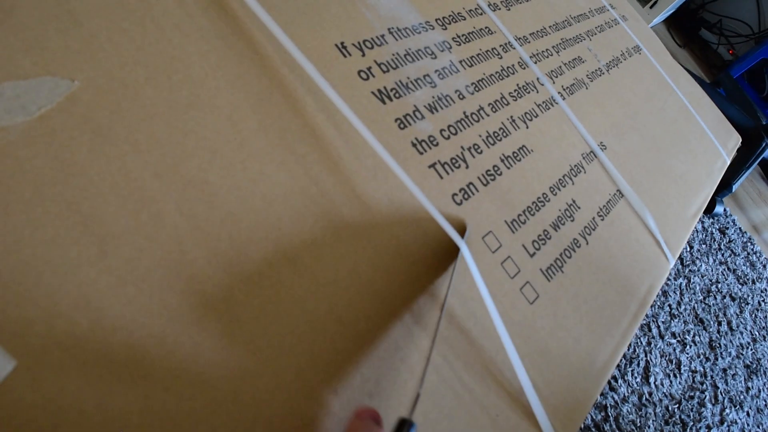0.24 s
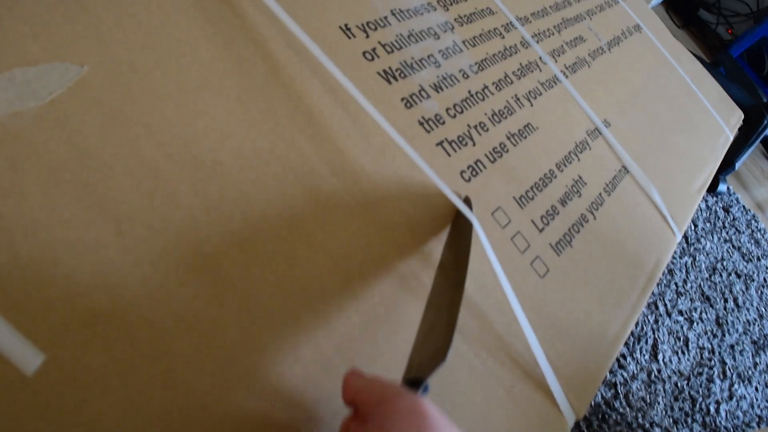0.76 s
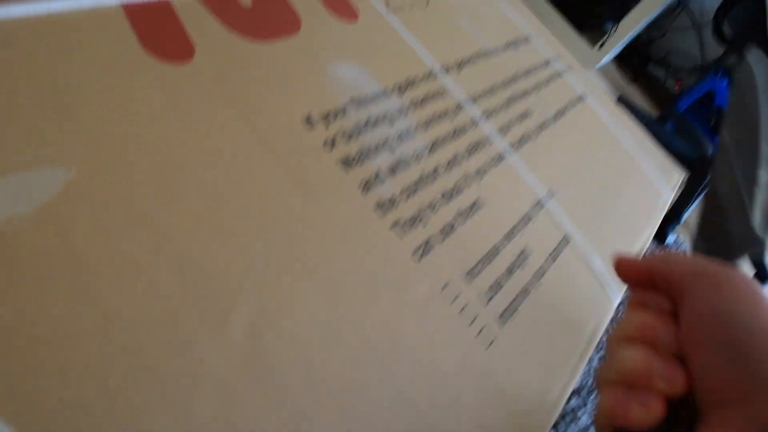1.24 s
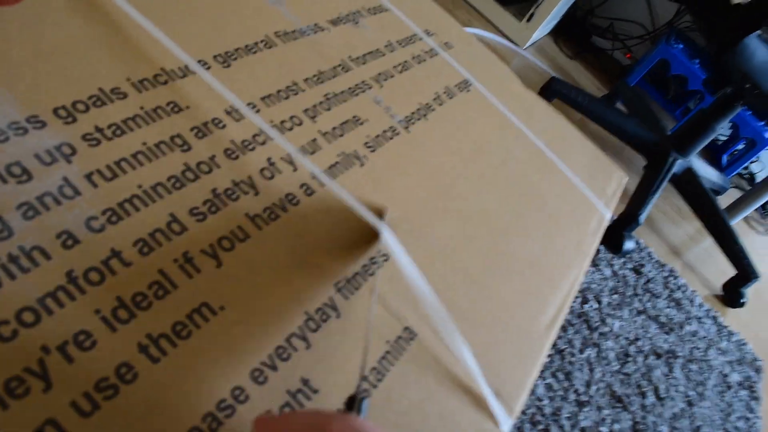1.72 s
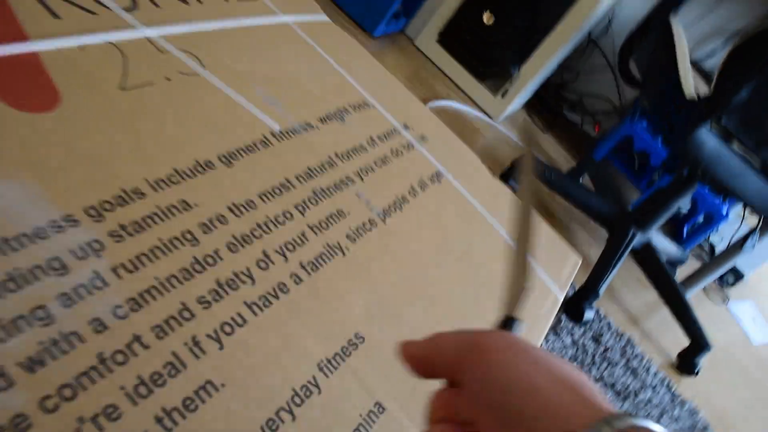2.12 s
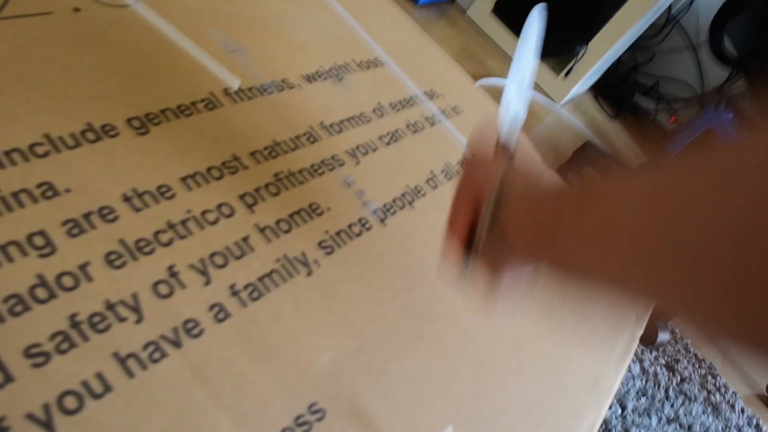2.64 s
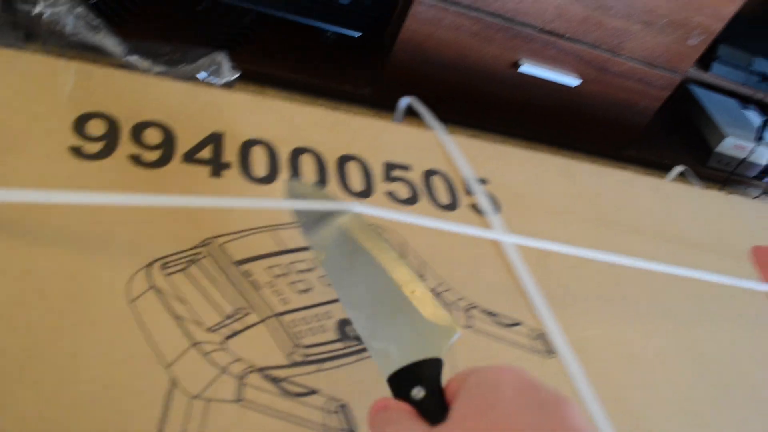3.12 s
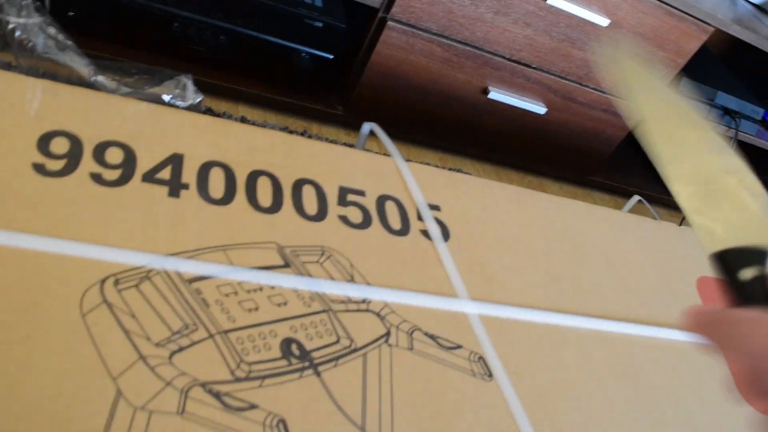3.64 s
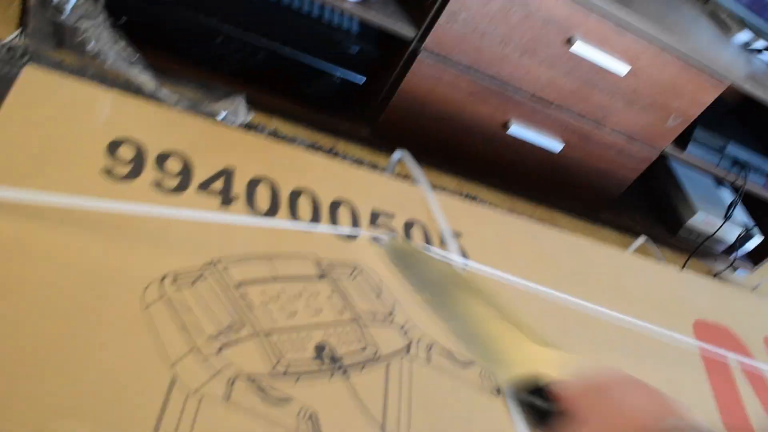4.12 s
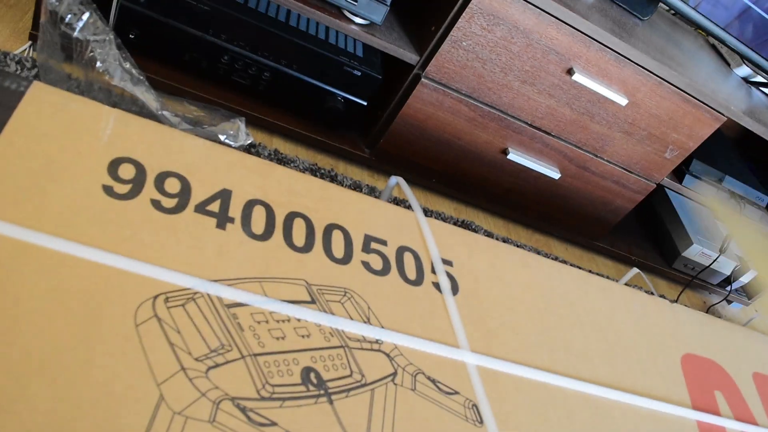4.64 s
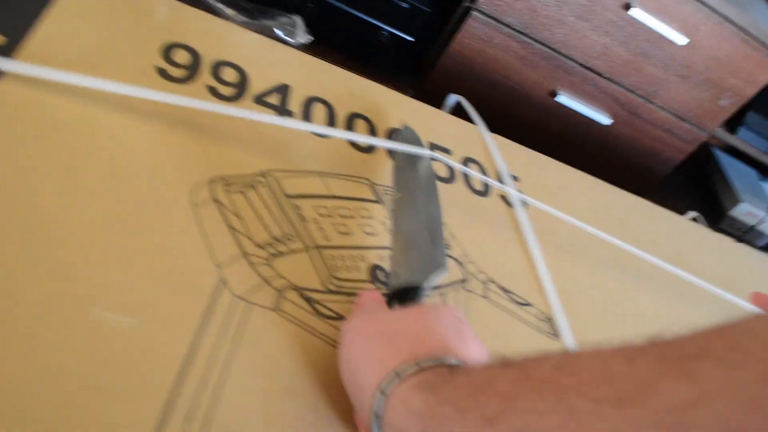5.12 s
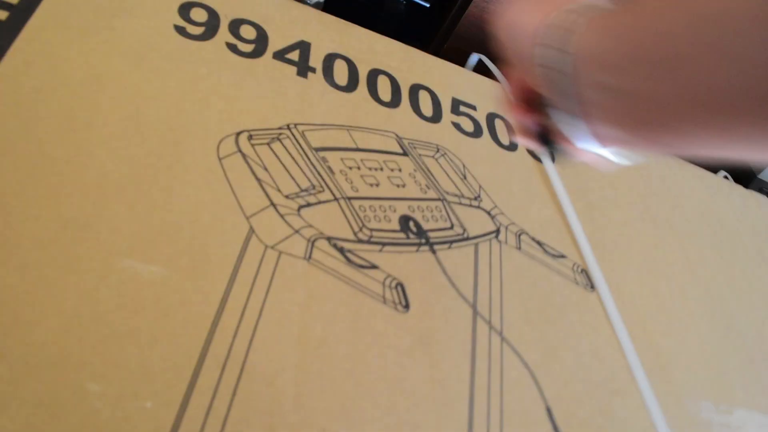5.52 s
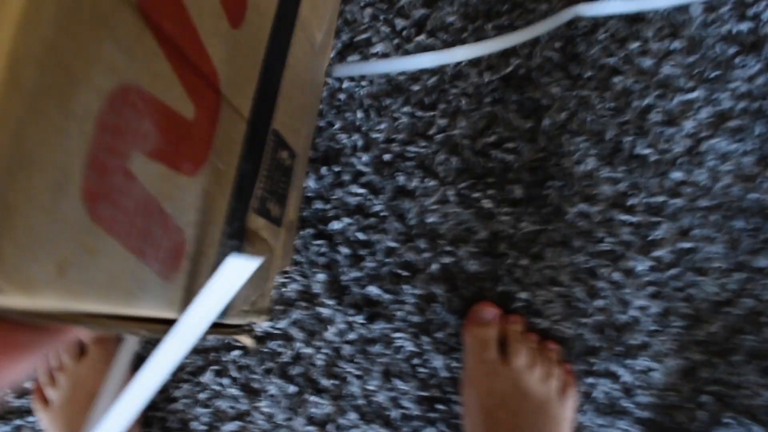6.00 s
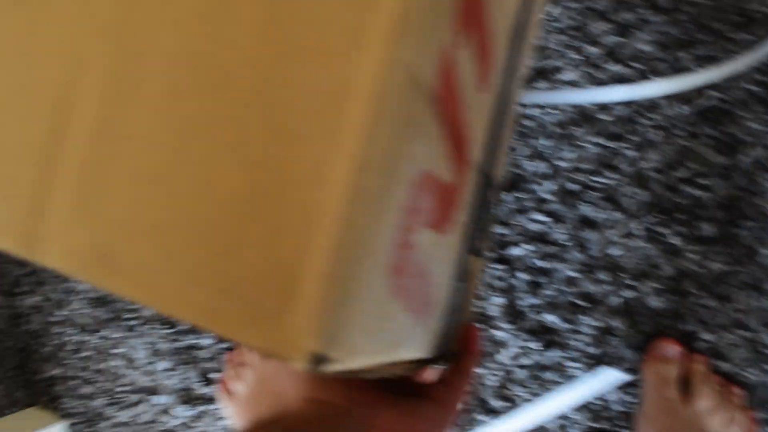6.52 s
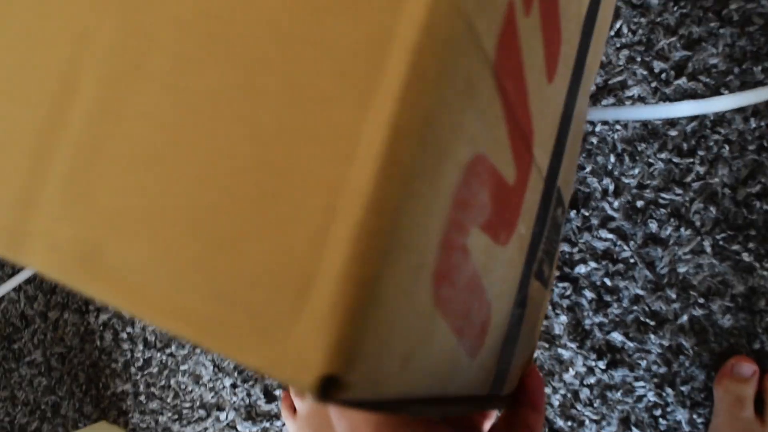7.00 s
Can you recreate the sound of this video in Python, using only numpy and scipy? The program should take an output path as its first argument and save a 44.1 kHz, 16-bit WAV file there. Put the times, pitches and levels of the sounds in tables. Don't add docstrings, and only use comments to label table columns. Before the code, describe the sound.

Close indoor scraping and boxy thumps, sharp snaps of parting plastic straps with clattering tails, then loose strap scuffing over cardboard.

```python
import sys
import numpy as np
from scipy import signal
from scipy.fft import rfft, irfft, next_fast_len
from scipy.io import wavfile
from scipy.ndimage import uniform_filter1d

SR = 44100
rng = np.random.default_rng(int(sys.argv[2]) if len(sys.argv) > 2 else 0)


def wav_out(sig):
    wavfile.write(sys.argv[1], SR, np.round(np.clip(np.atleast_2d(sig).T, -1, 1) * 32767).astype(np.int16))


def volts_from_decibels(level):
    exponent = np.asarray(level, float) / 20
    return 10 ** exponent


N = 320166

# (from [s], to [s], later by [s])
AGAIN = (1.475, 2.248, 3.4)


def along(points, hz):
    f, v = np.transpose(points)
    return np.interp(np.log(hz + 1), np.log(f + 1), v)


def filtered(x, response):
    m = next_fast_len(len(x) + 8192)
    return irfft(rfft(x, m) * response(np.fft.rfftfreq(m, 1 / SR)), m)[:len(x)]


def coloured(x, spectrum):
    return filtered(x, lambda f: volts_from_decibels(along(spectrum, f)))


def resonances(modes):
    def response(f):
        total = 0
        for k, (c, w, db) in enumerate(modes):
            total = total + (-1) ** k * volts_from_decibels(db) * 1j * f * w / (c * c - f * f + 1j * f * w)
        return total
    return response


def level(x, lo_hz, hi_hz):
    return x / np.std(filtered(x, lambda f: (f > lo_hz) & (f < hi_hz)))


def grit(rate, depth_db):
    lumps = np.interp(np.arange(N) * rate / SR, np.arange(4000), rng.standard_normal(4000))
    return rng.standard_normal(N) * volts_from_decibels(depth_db * lumps)


def patchy(x, depth_db):
    z = signal.stft(x, nperseg=512)[2]
    field = uniform_filter1d(rng.standard_normal(z.shape), size=9, axis=0)
    field = uniform_filter1d(field, size=12, axis=1)
    return signal.istft(z * volts_from_decibels(depth_db * field / field.std()), nperseg=512)[1][:N]


def ring(hz, db, t60, rise=0.00032):
    t = np.arange(SR // 4) / SR
    return volts_from_decibels(db - 60 * t / max(t60, .01)) * np.sin(2 * np.pi * hz * t) * (1 - np.exp(-t / rise))


def place(out, s, sound):
    out[round(s * SR):][:len(sound)] += sound


def twice(table):
    start, end, later = AGAIN
    rows = [np.array(r, float) for r in table]
    again = [r + later * (np.arange(r.shape[-1]) == 0) for r in rows if start < r.flat[0] < end]
    return rows + again


def gains(strokes, fade):
    out = np.zeros((len(strokes[0][0]) - 1, N))
    for rows in strokes:
        s, *cols = np.transpose(rows)
        begin, stop = s[0] - .003, s[-1] + fade
        n = np.arange(max(int(begin * SR), 0), min(int(stop * SR), N))
        edge = np.interp(n / SR, [begin, s[0], s[-1], stop], [0, 1, 1, 0])
        out[:, n] += edge * volts_from_decibels([np.interp(n / SR, s, c) for c in cols])
    return out


def layered(strokes, fade, layers, bands):
    return sum(g * level(x, *band) for g, x, band in zip(gains(strokes, fade), layers, bands))


def driven(strokes, mix):
    growth, db = np.transpose(mix)
    top = np.arange(len(mix)) >= len(mix) - 2
    return [[(s, *(growth * np.where(top, speed, pressure) + db)) for s, pressure, speed in rows]
            for rows in strokes]


def whipped(events, parts, dying):
    db, own_db, loss_db = np.transpose(parts)
    top = np.arange(len(db)) >= len(db) - 2
    strokes = []
    for s, hold, loud, bright, swell in events:
        mid = loud + db + bright * top
        swell_db = swell + own_db
        peak = mid + swell_db
        strokes.append([(s, *(mid - swell_db)), (s + hold, *peak), (s + hold + dying, *(peak + loss_db))])
    return strokes


def rubbing():
    # (time [s], pressure [dB], speed [dB])
    saw = [
        [(0, -24, -42), (0.06, -41, -69), (0.16, -49, -62)],
        [(0.17, -36, -61), (0.23, -29, -55.5), (0.33, -26.5, -51.5), (0.42, -25, -51.5), (0.5, -25, -46),
         (0.6, -31.5, -44), (0.66, -36, -47.5)],
        [(0.68, -34.5, -57), (0.72, -54.5, -55), (0.76, -35.5, -45), (0.86, -41.5, -47), (0.965, -37, -45.5)],
        [(1.385, -27.5, -39), (1.44, -53.5, -47.5), (1.47, -60, -63)],
        [(1.478, -31.5, -56.5), (1.57, -29.5, -42.5), (1.63, -37, -51), (1.69, -46.5, -57.5),
         (1.745, -41, -45.5)],
        [(4.8, -58, -65.5), (4.84, -40, -59.5), (4.87, -56.5, -61)],
    ]
    # (time [s], pressure [dB], speed [dB])
    graze = [
        [(2.25, -46, -42), (2.29, -31, -45.5), (2.35, -31, -58), (2.41, -30, -47), (2.44, -47, -56),
         (2.505, -44.5, -54)],
        [(2.92, -47.5, -54.5), (3.04, -54.5, -46.5), (3.08, -61, -64), (3.22, -69, -65.5), (3.26, -53, -60),
         (3.34, -64, -71)],
    ]
    # (time [s], pressure [dB], speed [dB])
    shove = [
        [(2.522, -32.5, -30), (2.565, -35, -45.5)],
        [(3.387, -58, -55), (3.415, -48, -53)],
        [(3.428, -34, -27), (3.455, -27, -50), (3.48, -34.5, -44.5), (3.52, -36.5, -47.5), (3.548, -28, -25.5)],
        [(3.88, -51.5, -52.5), (3.92, -32, -41), (3.98, -33, -42), (4.04, -45, -45), (4.118, -40.5, -43)],
    ]
    # (growth [dB per dB], offset [dB])
    saw_mix = [(0.97, -7), (1.026, -2), (1.013, 1.5), (1.102, -1)]
    graze_mix = [(0.598, -20.5), (1.008, 0.5), (1.01, -6), (1.201, 2.5)]
    shove_mix = [(1.01, 1), (1.01, 2), (1.01, 2), (1.01, -18.5)]
    # (time [s], share [0-1])
    judder = [
        (.58, .6),
        (.66, .8),
        (.75, .45),
        (7.26, .45),
    ]
    # (time [s], peak level [dB])
    catches = [(0.181, -32), (0.221, -17.5), (0.251, -23.5), (0.274, -21), (0.298, -19), (0.332, -22),
               (0.354, -19.5), (0.37, -17), (0.393, -14.5), (0.409, -17.5), (0.443, -17.5), (0.456, -21),
               (0.475, -19), (0.508, -22), (0.547, -26.5), (0.576, -23.5), (.531, -24), (.629, -28)]
    # (pitch [Hz], width [Hz], level [dB])
    drum = [(127, 44, 0)]
    box = [(258, 18, -6.5), (330, 66, 4.5), (425, 129, -3.5), (553, 130, -7.5)]
    rasp = [(624, 140, -1.5), (1347, 270, 0.5), (2050, 190, -4.5)]
    ridges = [(695, 170, -3), (1383, 270, -4.5), (2270, 400, -3), (4400, 260, -1), (6400, 550, -2.5),
              (8500, 500, -4)]
    # (frequency [Hz], level [dB per Hz])
    scrape = [(500, -14.5), (750, -9.5), (1350, -12.5), (1700, -14.5), (2350, -16), (2800, -19.5),
              (3600, -23.5), (4400, -22.5), (5200, -30), (6500, -47.5)]
    fizz = [(4500, -31), (5400, -10), (6000, 2.5), (6600, 4), (7700, 0), (8500, 2.5), (9700, -5),
            (11300, -9), (12500, -6.5), (13100, -8.5), (14500, -9.5), (16200, -15)]

    when, size = rng.uniform(size=(2, 750))
    when = (np.arange(750) + when) / 750
    strength = volts_from_decibels(-9 * size) * np.interp(when * N / SR, *np.transpose(judder))
    kicks = np.bincount((when * N).astype(int), strength, N)
    at, db = np.transpose(catches)
    hard = np.bincount((at * SR).astype(int) + 60, volts_from_decibels(db + 17.5), N)
    kicks = kicks + hard
    puffs = signal.lfilter([1], [1, -np.exp(-1 / (0.0061 * SR))], kicks)
    shake = 30 * kicks + grit(rate=40, depth_db=1.5)
    edge = patchy((.2 + puffs) * rng.standard_normal(N), depth_db=1.3)
    edge = filtered(edge, lambda f: 1 + volts_from_decibels(-2.5) * np.abs(resonances(ridges)(f)) ** 2)
    layers = [filtered(shake, resonances(drum)), filtered(shake, resonances(box)),
              coloured(edge, scrape), coloured(edge, fizz)]
    strokes = driven(saw, saw_mix) + driven(graze, graze_mix) + driven(shove, shove_mix)
    bands = [(80, 200), (230, 650), (900, 3500), (5000, 15000)]
    blade = layered(twice(strokes), .015, layers, bands)
    card = filtered(filtered(hard, resonances(rasp)), resonances(rasp))
    return blade + volts_from_decibels(2) * card


def background():
    # (frequency [Hz], level [dB per Hz])
    still_air = [(20, 2.5), (50, -1), (200, -10.5), (500, -22), (700, -30.5), (1600, -33.5), (4300, -41),
                 (11000, -48.5), (12500, -75.5), (16000, -79)]
    # (time [s], level [dB])
    jolts = [(1.01, -24.5), (1.84, -33.5), (2.63, -28), (4.18, -24.5), (7.5, -28.5), (6.1, -32),
             (6.57, -32.5), (5.85, -35), (7.2, -31.5), (6.22, -38.5), (5.6, -41), (4.1, -34.5),
             (3.98, -32.5), (6.95, -38), (2.38, -34)]
    rise, fall = 230, 76
    air = volts_from_decibels(-55) * level(coloured(rng.standard_normal(N), still_air), 140, 8000)
    lumps = grit(rate=9, depth_db=2)
    low = coloured(lumps, [(15, -30.0), (28, -11.0), (42, 2.5), (62, -9.0), (95, -34.5), (200, -79.5)])
    t = np.arange(N) / SR
    shake = volts_from_decibels(-48)
    for s, db in twice(jolts):
        shake = shake + volts_from_decibels(db + np.minimum(rise * (t - s), fall * (s - t)))
    return air + shake * level(low, 20, 70)


def thumps():
    # (time [s], peak level [dB], pitch [Hz], t60 [s])
    blows = [(0.221, -14.5, 385, 0.038), (0.369, -16.5, 293, 0.068), (0.393, -15, 298, 0.05),
             (0.980, 1, 130, 0.075), (1.369, -14, 473, 0.04), (1.7585, 3.5, 107, 0.048),
             (1.799, 4.5, 126, 0.032), (1.808, -0.5, 102, 0.067), (1.8, -4, 200, .02),
             (1.811, -5, 190, .02), (1.032, -8, 105, .14), (7.063, -13, 229.5, .05), (5.7, -28, 218, .15),
             (5.84, -22, 205, .1), (1.835, -8, 100, 0.087), (1.851, -3, 110.4, 0.17),
             (2.53, -15, 382, 0.22), (2.69, -14, 244.6, 0.2), (2.578, -5, 116, 0.24), (2.6, 3, 193, 0.064),
             (3.424, -12, 102.4, 0.15), (3.46, -12.5, 143, 0.096), (3.5, -13, 127, 0.038),
             (3.59, -17.5, 320, 0.22), (3.902, -14.5, 125.7, 0.3), (4.135, -9, 121, 0.18),
             (5.838, -12, 127, 0.097), (6.063, -10.5, 60, 0.1), (5.93, -17.5, 60, 0.15),
             (6.215, -22, 50, 0.1), (3.57, -8, 306, 0.049), (3.579, -5, 330, 0.037), (4.23, -15, 125, 0.21),
             (2.635, -10, 349.6, 0.12), (6.295, -20.5, 136, 0.093), (7.068, -11, 330, 0.085),
             (7.078, -7, 122.5, 0.098), (7.228, -27, 123, 0.036)]
    out = np.zeros(N + SR)
    for s, db, hz, t60 in twice(blows):
        rise = 0.098 / hz
        place(out, s + .003, ring(hz, db - 3.5, t60, rise))
        place(out, s + .003, ring(2.2 * hz, db - 7.5, 0.28 * t60, rise / 2))
    return out[:N]


def cracks():
    # (time [s], peak level [dB], sharp part [dB])
    snaps = [(0.9805, -2, -8), (1.8332, -20, 3.5), (2.2443, -26, -7), (2.2722, -24, -15),
             (2.3261, -18, -9.5), (2.337, -17.5, -12.5), (2.5296, -34.5, -4.5), (2.577, -5, -17),
             (2.6194, -14, -14), (2.9287, -30.5, -3), (2.9522, -33.5, -6.5), (2.9776, -37, -1.5),
             (3.5026, -24.5, -6.5), (3.551, -3, -9.5), (4.132, -8, -3.5), (4.196, -3, -8)]
    taps = [
        (1.3709, -22, -7),
        (1.7606, -16, -12),
        (1.8585, -8.5, 0.5),
        (2.5995, -8.5, -10),
        (3.4175, -31, -3.5),
        (3.4242, -25, -16),
        (3.464, -27, -4),
        (5.7024, -39.5, -2),
        (7.0608, -28, -25),
    ]
    small_ticks = [(0.3938, -29.5, -6.5), (1.4314, -34.5, 1), (1.718, -44.5, 13), (1.8032, -21, -1),
                   (2.2945, -31.5, -1.5), (2.362, -32, -3), (2.387, -26.5, -7.5), (2.397, -15.5, -17.5),
                   (2.492, -45.5, -10.5), (2.506, -35.5, -7), (2.5205, -24, -12.5), (3.5561, 1.5, -5.5),
                   (3.8875, -34.5, -18), (3.938, -30.5, -16.5), (4.2022, 7, -8), (5.8097, -30, -19),
                   (7.0706, -9.5, -32), (7.2268, -15, -20)]
    slaps = [(1.0145, -4.5, -10), (1.0235, -12, -4), (1.034, -12, -5), (1.0445, -22, 6), (1.0645, -19, 8),
             (1.1025, -18.5, 6), (1.1075, -21.5, -2), (1.1135, -22.5, 4.5), (1.1195, -35, -3),
             (1.4025, -36.5, -4), (1.768, -31, -2), (1.8095, -25.5, 0.5), (1.8385, -27, 2),
             (1.8635, -15.5, 0.5), (1.898, -8, 0.5), (2.251, -35.5, 0.5), (2.2845, -36, -3.5),
             (2.303, -35.5, -2), (2.405, -34.5, 1), (0.531, -38, 0), (2.585, -10.5, -7.5), (2.62, -4, -9),
             (3.4315, -42, 2), (3.561, -14, 0), (4.147, -8.5, -8), (4.1635, -12, -10), (4.2065, -2, -6),
             (4.235, -14, -3), (4.251, -11, -7.5), (5.852, -36.5, -0.5), (6.274, -34, -4),
             (6.2915, -40, 12), (6.4295, -46, 8), (6.437, -44, 5), (6.4695, -50, 10), (6.476, -44, 0),
             (6.54, -42, -5), (6.559, -33, -1), (6.708, -38, 10), (7.09, -36, -6), (7.2465, -36, 2)]
    nicks = [(0.9767, -1, -4), (1.8515, -1, -5), (1.8545, -3, -6), (1.859, 1, -7), (3.893, -44, -1),
             (3.9135, -46, 3), (3.9385, -33, -1), (7.018, -22, -6), (7.2048, -24, -6), (7.2125, -30, -12),
             (7.0615, -24, -10)]
    # (events, dull part dB, t60 s)
    kinds = [(snaps, -4.5, 0.027), (taps, 8, 0.027), (small_ticks, 0.5, 0.013),
             (slaps, -5.5, 0.0088), (nicks, -14, 0.011)]
    ticks = twice([(s, db, dull, sharp, t60) for rows, dull, t60 in kinds for s, db, sharp in rows])

    t = np.arange(SR // 10) / SR
    parts = np.zeros((3, N + len(t)))
    for s, db, dull_db, sharp_db, t60 in ticks:
        shape = volts_from_decibels(db - 60 * t / t60) * (1 - np.exp(-t / 0.00095))
        burst = shape * rng.standard_normal(len(t))
        parts[:, round(s * SR):][:, :len(t)] += volts_from_decibels([[dull_db], [0], [sharp_db]]) * burst
    dull = coloured(parts[0], [(400, -12.0), (900, 10.0), (1700, 9.0), (3000, 5.0), (4500, -31.0)])
    snap = coloured(parts[1], [(2500, -23.0), (3700, 5.0), (4500, 5.0), (6500, -0.5), (8500, -28.5)])
    sharp = coloured(parts[2], [(5500, -23.5), (7200, 11.5), (8600, 9.0), (12000, 5.0), (16000, 6.5)])
    return (dull + snap + sharp)[:N]


def lashing():
    # (time [s], hold [s], level [dB], brightness [dB], swell [dB])
    lashes = [
        (0.984, 0.1, -15, -15.5, -4),
        (1.866, 0.049, -14, -3.5, 3),
        (2.584, 0.066, -16.5, -4.5, 3),
        (3.562, 0.049, -14, 2, 1.5),
        (4.21, 0.051, -14.5, 3.5, 2.8),
    ]
    creaks = [
        (1.765, 0.024, -18.5, -18.5, -2),
        (1.803, 0.03, -18.5, -17, -1.5),
        (4.137, 0.054, -16, -5, 0.5),
    ]
    whirr = [
        (1.01, 0.074, -31, 0, 1.5),
    ]
    # (level [dB], swell [dB], loss [dB])
    lash_parts = [(0.65, -3.5, -27), (-2, 0.5, -21.5), (-10, 0, -22), (-20, -1, -28)]
    creak_parts = [(0.5, -1.9, -5), (-10.5, 2, 0.5), (-7.5, -2, -2.5), (-17.5, -2.5, -2)]
    whirr_parts = [(-41.5, 0, 0), (-39, 0.0014, 0), (-2, 0, -4), (-1.5, 0, -2.5)]
    # (frequency [Hz], level [dB per Hz])
    boom = [(24, -35), (40, -14.5), (115, -3.5), (150, -7), (205, -9), (280, -6.5), (358, -8.5), (466, -9),
            (519, -13), (700, -14), (910, -41), (1540, -120)]
    rattle = [(290, -24), (500, -3), (972, -1), (1090, 0), (3030, -10), (4450, -13.5), (5000, -44),
              (6500, -35.5), (11000, -120)]
    sizzle = [(3500, -16.5), (4600, 4), (7300, 0.5), (10000, -7.5), (12000, -38)]
    whistle = [(8500, -38), (10500, -0.5), (13000, 1), (15500, -5), (16300, -9)]

    slapping = grit(rate=500, depth_db=1.8)
    layers = [coloured(grit(rate=56, depth_db=4), boom)]
    layers += [coloured(slapping, s) for s in (rattle, sizzle, whistle)]
    strokes = whipped(lashes, lash_parts, dying=0.1)
    strokes += whipped(creaks, creak_parts, dying=0.0031)
    strokes += whipped(whirr, whirr_parts, dying=0.0031)
    return layered(twice(strokes), 0.013, layers, [(60, 500), (700, 4000), (5000, 9500), (11000, 15500)])


def knocks():
    # (time [s], peak level [dB], pitch [Hz])
    spine = [(1.369, -7, 1650), (1.7585, -3, 248), (1.851, -9, 520), (2, -27, 250), (2.6, -6, 1400),
             (3.417, -12, 650), (3.461, -11, 540), (3.471, -14, 540), (4.712, -41, 1455),
             (3.25, -43.5, 1200), (1.372, -20, 960), (1.762, -8.5, 1000), (7.226, -16, 2000),
             (7.234, -24, 1900), (7.243, -23, 1750), (4.2, -12, 7800), (2.394, -22, 980),
             (2.7, -23.5, 1350), (1.832, -14, 2500), (1.85, -11.5, 2300), (3.419, -13, 1800),
             (3.884, -24, 643), (3.4, -20, 705), (4.129, 1, 549), (4.144, -13.5, 397), (6.295, -19.5, 440),
             (7.016, -17, 4500), (7.225, -6.5, 1690), (7.23, -19, 1730)]
    out = np.zeros(N + SR)
    for s, db, hz in twice(spine):
        place(out, s + .003, ring(hz, db, 14.4 / hz))
    return out[:N]


def hums():
    # (time [s], level [dB], pitch [Hz], t60 [s])
    bowed = [(1.48, -22, 355, .2), (1.508, -24, 330, .15), (1.555, -23, 355, .15), (1.588, -24, 320, .12),
             (2.277, -17, 345, .13), (2.302, -15, 352, .12), (2.341, -12, 340, .12), (2.368, -14, 325, .11),
             (2.402, -11, 315, .08), (2.442, -23, 300, .1), (6.82, -31, 410, .2), (6.89, -31, 430, .2)]
    out = np.zeros(N + SR)
    for s, db, hz, t60 in twice(bowed):
        place(out, s, ring(hz, db, t60, rise=.007))
    return out[:N]


def pings():
    # (time [s], level [dB])
    strikes = [
        (2.598, -19.5),
        (3.432, -50),
        (3.502, -37),
        (3.53, -36),
        (3.556, -18.5),
        (4.204, -29.5),
    ]
    # (pitch [Hz], level [dB], t60 [s])
    steel = [(7400, -6, .05), (8600, 0.5, .1), (9800, -15, 0.026)]
    out = np.zeros(N + SR)
    for s, db in strikes:
        for hz, mode_db, t60 in steel:
            place(out, s, ring(hz, db + mode_db + 2 * rng.standard_normal(), t60))
    return out[:N]


def dragging():
    # (time [s], weight on the box [dB], speed [dB])
    pulls = [
        [(5.66, -32, -54.5), (5.73, -40, -75), (5.79, -53, -52), (5.83, -38, -55.5), (5.875, -34, -51.5),
         (5.91, -32, -39.5), (5.94, -34, -36.5), (6.03, -31, -36), (6.14, -38, -42), (6.2, -45, -36.5),
         (6.22, -33.5, -47.5), (6.26, -31.5, -48.5), (6.29, -34, -38.5), (6.34, -48, -51), (6.5, -41.5, -53.5)],
        [(6.515, -45, -58), (6.545, -38, -47.5), (6.57, -39, -40), (6.65, -45, -40.5), (6.72, -40, -39.5),
         (6.84, -34, -36), (6.93, -32, -41), (7.0, -37, -42.5), (7.05, -33, -42)],
        [(7.06, -30, -41), (7.08, -11, -37.5), (7.13, -39, -45), (7.18, -34, -45.5), (7.21, -31, -42.5),
         (7.26, -34, -43)],
    ]
    # (growth [dB per dB], offset [dB])
    pull_mix = [(1.008, -3), (1.008, 0.8), (1.302, 10.5)]
    # (frequency [Hz], level [dB per Hz])
    drone = [(41, -57), (70, -1), (113, -2), (155, -4), (200, -5.5), (235, -5.5), (304, -17), (410, -2.5),
             (800, -30.5), (1040, -26), (1760, -120)]
    scrape = [(410, 4.5), (700, 2), (773, -2.5), (973, 0), (1400, 1.5), (2000, -1.5), (2880, -4.5),
              (3690, -3.5), (5000, -14.5), (6500, -46), (11000, -120)]
    fizz = [(3200, -18), (4500, 1), (6200, 2.5), (7500, 1), (10000, -6), (11300, -7.5), (12300, -7.5),
            (13400, -10), (15000, -8), (16200, -17.5)]
    # (pitch [Hz], width [Hz], level [dB])
    strap = [(2630, 110, -13), (3710, 180, -3), (4400, 150, -10.5), (5880, 100, -16), (8550, 250, -18)]
    end_ring = [(12300, 700, 0)]
    # (time [s], level [dB])
    end_free = [(5.85, 0), (6.0, 7), (6.3, 5), (6.6, 5), (6.85, 5), (7.0, -9), (7.26, -15)]

    roughness = 1 + np.abs(grit(rate=250, depth_db=3)) / 4
    hiss = patchy(grit(rate=30, depth_db=1.2) * roughness, depth_db=2)
    free = volts_from_decibels(np.interp(np.arange(N) / SR, *np.transpose(end_free)))
    hiss = hiss + volts_from_decibels(8) * filtered(hiss, resonances(strap))
    hiss = hiss + free * filtered(hiss, resonances(end_ring))
    layers = [coloured(hiss, s) for s in (drone, scrape, fizz)]
    return layered(driven(pulls, pull_mix), .02, layers, [(90, 600), (900, 3500), (5000, 15000)])


def whine():
    # (from [s], to [s], pitch [Hz], width [Hz])
    slide = (6.33, 6.53, 2580, 70)
    start, end, hz, width = slide
    tone = filtered(rng.standard_normal(N), resonances([(hz, width, 0)]))
    fade = np.interp(np.arange(N) / SR, [start, start + .05, end, end + .05], [0, 1, 1, 0])
    return volts_from_decibels(-54.5) * tone / tone.std() * fade


def room(x):
    # (frequency [Hz], t60 [s])
    die_away = [(100, 0.63), (210, 0.67), (500, 0.48), (2000, 0.55), (6000, 0.42), (12000, 0.24)]
    # (frequency [Hz], level [dB])
    wall_colour = [(120, -0.5), (165, -1.5), (220, -5.5), (300, 0), (1000, 0), (8000, 0)]
    out, step = np.zeros(N + 2 * SR), SR // 3
    for start in range(0, N, step):
        hz, t, z = signal.stft(rng.standard_normal(SR * 3 // 4), SR, nperseg=256)
        decay = volts_from_decibels(-60 * t / along(die_away, hz)[:, None])
        tail = signal.istft(z * decay, SR, nperseg=256)[1]
        wet = signal.fftconvolve(x[start:start + step], tail / np.linalg.norm(tail))
        out[start + 300:][:len(wet)] += wet
    return coloured(out[:N], wall_colour)


def spliced(x):
    start, end, later = AGAIN
    fade = np.interp(np.arange(N) / SR - later, [start, start + .006, end - .02, end], [0, 1, 1, 0])
    return np.sqrt(1 - fade) * x + np.sqrt(fade) * np.roll(x, round(later * SR))


def scene():
    rub = rubbing() + dragging() + whine()
    hits = thumps() + cracks() + volts_from_decibels(-2.0) * lashing() + knocks() + hums() + pings()
    echoes = volts_from_decibels(-11.0) * room(hits + volts_from_decibels(-0.5) * rub)
    return spliced(hits + rub + echoes + background())[None]


def top_cut(x):
    return signal.sosfilt(signal.butter(12, 16970, fs=SR, output="sos"), x)


def record(dry):
    x = dry / (1 + np.abs(dry / .93) ** 4) ** (1 / 4)
    band = [(5, -40), (30, -2.0), (15700, -2.0), (16100, -24.5), (17000, -50.5), (17200, -85.5)]
    mix = coloured(x[0], band)[None]
    return top_cut(mix)


dry = scene()
out = record(dry)
wav_out(out)
```